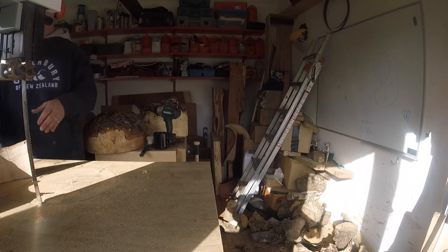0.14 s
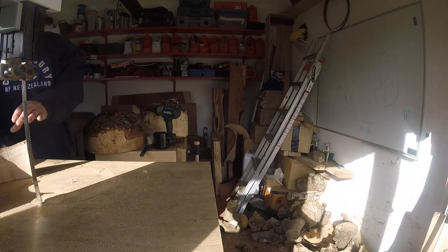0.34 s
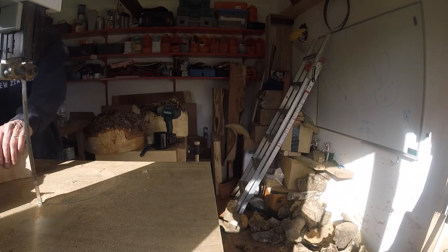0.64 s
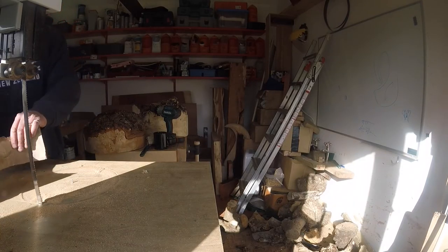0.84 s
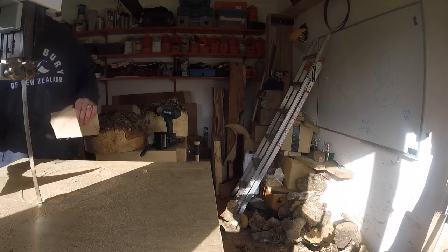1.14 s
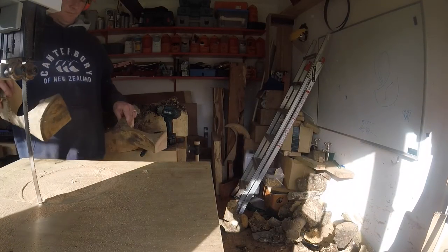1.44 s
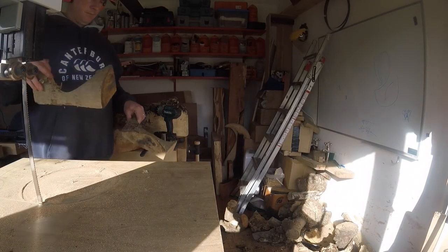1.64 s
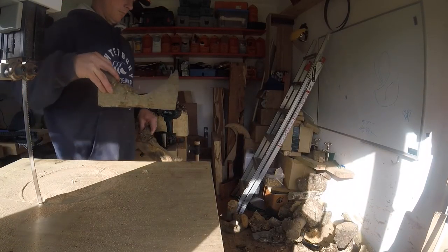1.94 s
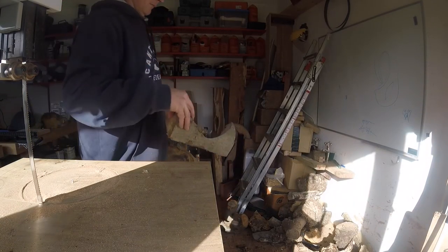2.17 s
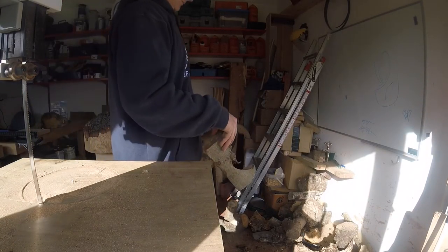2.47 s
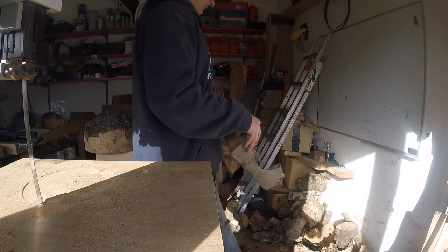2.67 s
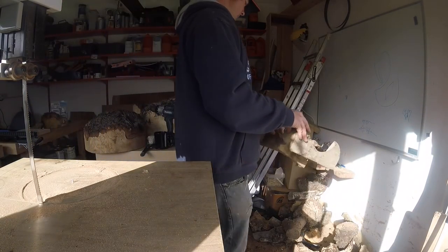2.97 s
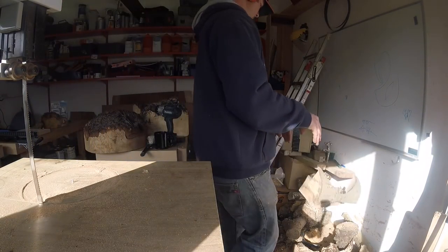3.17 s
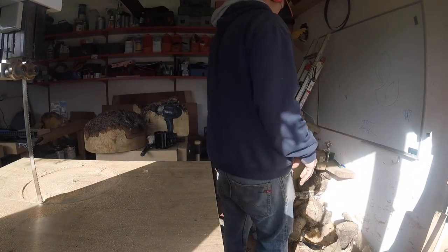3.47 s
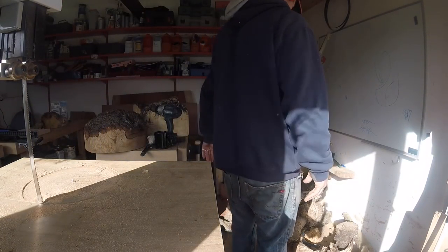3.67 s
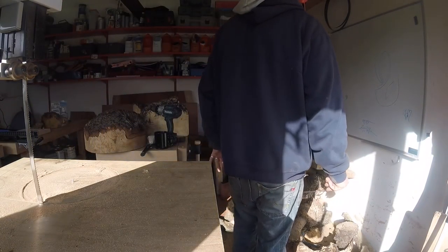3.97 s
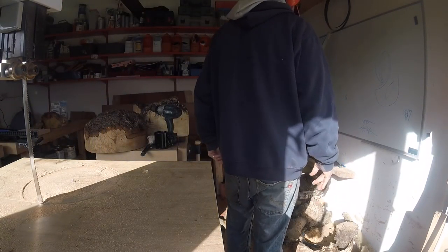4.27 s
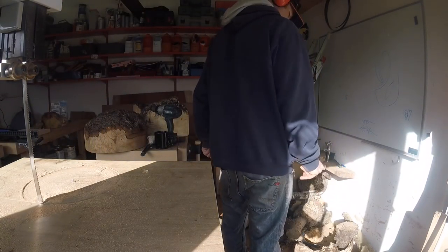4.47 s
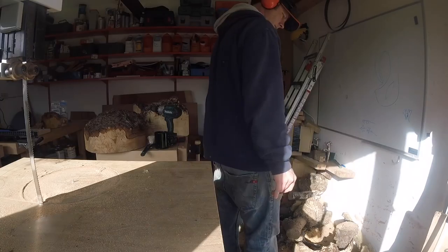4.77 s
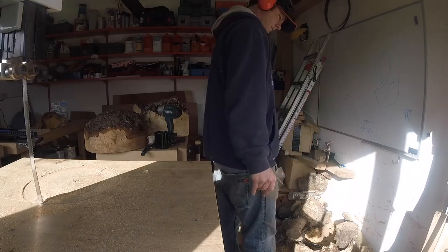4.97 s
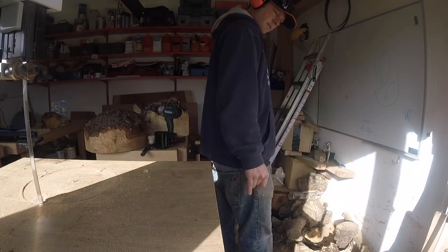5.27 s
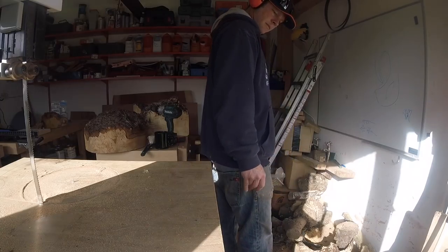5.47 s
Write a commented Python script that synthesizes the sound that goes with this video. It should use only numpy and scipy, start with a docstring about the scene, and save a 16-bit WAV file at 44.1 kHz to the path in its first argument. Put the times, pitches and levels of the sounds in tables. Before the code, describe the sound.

Over a steady, throbbing machine hum, a wooden block is handled with knocks and scuffs, then dropped on logs.

```python
"""In a small workshop, a bandsaw idles with a throbbing hum as its turning wheel shakes it.
A block of wood judders off the saw table, making it ring and rock. Hard pieces clack together,
and grit catches under shoes that scuff the floor. The wood is dropped on a log pile, where it
thuds, tumbles and settles: each knock rings the logs and echoes briefly in the room."""
import sys
import numpy as np
from scipy import signal
from scipy.fft import rfft, irfft
from scipy.io import wavfile
from scipy.ndimage import uniform_filter1d

SR = 44100
rng = np.random.default_rng(int(sys.argv[2]) if len(sys.argv) > 2 else 0)


def store_pcm(level_fs):
    """Save levels as 16-bit WAV."""
    pcm = np.round(np.clip(level_fs, -1, 1) * 32767).astype(np.int16)
    wavfile.write(sys.argv[1], SR, np.atleast_2d(pcm).T)


N = 247401


def amp(db):
    """Turns decibels into a gain."""
    return 10 ** (np.asarray(db) / 20)


def evened(x):
    """Scales a signal to an average (rms) level of 1."""
    return x / np.sqrt(np.mean(x ** 2) + 1e-20)


def curve(points, hz):
    """Joins (f/Hz, value) points with straight lines on an octave scale."""
    f, value = np.transpose(points)
    return np.interp(np.log(hz + 1), np.log(f + 1), value)


def add(mix, s, sound):
    """Mixes a sound in at s seconds."""
    part = mix[max(round(s * SR), 0):][:len(sound)]
    part += sound[:len(part)]


def coloured(x, points):
    """Filters x by a curve of (f/Hz, level/dB) points."""
    return irfft(rfft(x) * amp(curve(points, np.fft.rfftfreq(len(x), 1 / SR))), len(x))


def sharp_pulse(db):
    """The fastest-starting pulse with these levels, given from 0 Hz to half the sample rate."""
    log_gain = np.log(amp(np.maximum(np.r_[db, db[-2:0:-1]], -120)))
    return np.fft.ifft(np.exp(np.conj(signal.hilbert(log_gain)))).real


def drift(top_hz):
    """A slow random wander, about 1 in size."""
    t = np.arange(0, N, 100) / SR
    rates = top_hz * np.geomspace(1 / 10, 1, num=10)
    wander = sum(np.sin(2 * np.pi * (f * t + rng.random())) / np.sqrt(f) for f in rates)
    return evened(wander).repeat(100)[:N]


def shaken(modes):
    """Random shaking keeps an object's natural notes (its modes) ringing."""
    out, hz = np.zeros(N), np.fft.rfftfreq(N, 1 / SR)
    for f, width, db in modes:
        band = rfft(rng.standard_normal(N)) / (1 + ((hz - f) / width) ** 2)
        out += amp(db) * evened(irfft(band, N))
    return out


def struck(blows, modes, rattle_colour, detune, focus_db, rattle_db, rattle_t60, rise_s):
    """Blows ring an object while the touching faces rattle; a t60 is the time to fade by 60 dB."""
    out, t = np.zeros(N), np.arange(SR // 2) / SR
    hz, mode_db, t60 = np.transpose(modes)[:, :, None]
    attack = 1 - np.exp(-(t / rise_s) ** 2)
    for s, level_db, driven_hz in blows:
        # the length of the contact picks the notes that answer most
        gain = amp(mode_db - focus_db * np.log2(hz / driven_hz) ** 2)
        tuning, phase = rng.random((2, len(modes), 1))
        tuned_hz = hz * (1 + detune * (2 * tuning - 1))
        notes = gain * amp(-60 * t / t60) * np.sin(2 * np.pi * (tuned_hz * t + phase))
        ring = notes.sum(0) * np.sqrt(2) / np.linalg.norm(gain)
        rattle = evened(coloured(rng.standard_normal(len(t)), rattle_colour))
        rattle *= amp(rattle_db - 60 * t / rattle_t60)
        add(out, s, amp(level_db) * (ring + rattle) * attack)
    return out


def room(x, early_db=2, early_t60=0.18):
    """Sound bounces off nearby clutter, then leaves a tail whose treble dies first."""
    # how long the room rings: f/Hz, t60/s
    fade_times = [(150, 0.71), (500, 0.46), (1500, 0.52), (4000, .42), (8000, 0.42), (14000, 0.16)]
    echoes = np.zeros(SR)
    at = np.arange(70, SR - 20, 14)
    echoes[at + rng.integers(0, 14, len(at))] = rng.choice([-1., 1.], len(at))
    hz, t, bands = signal.stft(echoes, SR, nperseg=256)
    decay = amp(-60 * t / curve(fade_times, hz)[:, None]) + amp(early_db - 60 * t / early_t60)
    tail = signal.istft(bands * decay, SR, nperseg=256)[1]
    return signal.fftconvolve(x, tail / np.linalg.norm(tail))[:N]


def varied_room(x, count=4):
    """Fades between different room echoes, so that one knock does not ring just like the next."""
    turn = np.arange(N) / 700  # next echo every 16 ms
    shares = (np.maximum(1 - abs((turn - k) % count - 1), 0) for k in range(count))
    return sum(room(x * np.sqrt(share)) for share in shares)


def saw(wheel_hz=7.156, wander=0.0011, flutter_db=0.5, rush_db=-51.5, throb=0.015):
    """The wheel's tones beat against each other; the moving blade adds a rush and shakes the frame."""
    # tones of the hum: multiple of the wheel's turning rate, level/dB
    tones = [(19, -50), (20, -58), (23, -43.5), (24, -31.5), (25, -59), (28, -55), (29, -41), (30, -53),
             (40, -55), (57, -60), (90, -65)]
    # colour of the blade's rush: f/Hz, level/dB
    rush_colour = [(30, -51), (85, -20), (120, -19), (150, 10), (200, 3.5), (330, -4), (560, -9),
                   (1500, -14.5), (3300, -21), (5200, -33), (6700, -27), (9500, -29.5), (11800, -36.5),
                   (15000, -39.5)]
    # notes of the frame and guards: f/Hz, width/Hz, level/dB
    frame_modes = [(161.3, 9.4, -46), (303, 6.4, -57), (407.3, 7.6, -64.5), (685, 6.5, -64.5),
                   (1532, 40, -65), (1950, 180, -66.5)]
    turns = np.cumsum(wheel_hz * (1 + wander * drift(top_hz=2.03))) / SR
    hum = sum(amp(db) * np.sqrt(2) * np.sin(2 * np.pi * (k * turns + rng.random())) for k, db in tones)
    rush = coloured(rng.standard_normal(N), rush_colour)
    above_hum = signal.sosfilt(signal.butter(4, 400, "high", fs=SR, output="sos"), rush)
    rush *= amp(rush_db) / np.std(above_hum)  # rush_db sets the part above 400 Hz
    rush *= 1 + throb * np.sin(2 * np.pi * turns)
    hum *= amp(-flutter_db * drift(top_hz=13))
    return hum + rush + shaken(frame_modes)


def table_sway(peak_s=0.95, width_s=0.21, fall_db_per_s=10):
    """The table rocks as the block's weight leaves it, then calms to the motor's steady tremble."""
    # deep notes of the table on its stand: f/Hz, width/Hz, level/dB
    stand_modes = [(33, 8.7, -1.5), (70, 10, -3.5)]
    t = np.arange(N) / SR - peak_s
    swell = amp(-50) * np.exp(-(t / width_s) ** 2)
    tremble = (t > 0) * amp(-58 - fall_db_per_s * t)
    return (swell + tremble + amp(-81)) * shaken(stand_modes)


def scuffs(grain_db=5, attack_s=0.026):
    """Shoes, sleeves and bark rub: grit and fibres catch as each stroke presses and eases off."""
    # rubbing strokes: t/s, length/s, level/dB
    strokes = [(0.254, 0.14, -34), (0.553, 0.2, -48), (0.697, 0.036, -39), (0.822, 0.079, -40),
               (1.097, .14, -57), (1.582, 0.19, -37), (1.655, 0.65, -39), (1.928, 0.14, -36.5),
               (2.379, 0.086, -33.5), (2.438, 0.13, -33.5), (2.745, 0.18, -47.5), (2.93, .13, -46.5),
               (3.246, 0.19, -39), (3.311, 0.23, -31.5), (3.651, 0.18, -45.5), (4.158, .11, -49),
               (4.74, 0.4, -47.5), (5.103, 0.22, -46.5)]
    # colour of the rubbing: f/Hz, level/dB
    rub_colour = [(100, 1), (350, 5), (900, 2.5), (2300, 1), (4200, -4), (6500, -15.5), (10000, -24.5),
                  (15000, -41)]
    t = np.arange(N) / SR
    pressure = sum(amp(db) * np.interp(t - start, [0, attack_s, length], [0, 1, 0])
                   for start, length, db in strokes)
    grains = rng.standard_normal(N) * amp(grain_db * rng.standard_normal(N))
    return pressure * evened(coloured(grains, rub_colour))


def edge_ticks(t60=0.0032, focus_db=22, size=1024):
    """Sharp edges snap against each other in tiny bright bursts."""
    # snaps: t/s, level/dB, centre f/Hz
    snaps = [(1.275, -29, 3800), (1.435, -22.5, 4940), (1.9, -37, 9500), (2.136, -37, 3430),
             (2.652, -22, 7600), (3.337, -19.5, 10000), (3.363, -15, 5560), (3.407, -20, 9000),
             (4.707, -32, 1950)]
    out, hz, t = np.zeros(N), np.fft.rfftfreq(size, 1 / SR), np.arange(size) / SR
    for s, level_db, centre_hz in snaps:
        band_db = np.maximum(-focus_db * np.log2((hz + 1) / centre_hz) ** 2, -60)
        edge = sharp_pulse(band_db - 20 * (hz > 11500))
        burst = rng.choice([-1., 1.], size) * amp(level_db - 60 * t / t60)
        add(out, s, signal.fftconvolve(burst, edge / np.linalg.norm(edge)))
    return out


def clacks(gap_s=0.009, stretch=1.25, fall_db=1.5):
    """A hard, dry piece bounces on another, each time after a longer gap and more weakly."""
    # clacks: t/s, level/dB, most strongly driven f/Hz, number of touches
    hits = [(1.836, -18.5, 2400, 5), (1.9, -26.5, 2600, 2), (1.998, -25, 2550, 1), (2.239, -32.5, 2850, 1)]
    # notes of the piece: f/Hz, level/dB, t60/s
    piece_modes = [(2500, 7, 0.035), (2490, -5, 0.094), (2480, -10, 0.052), (2234, 3, 0.014),
                   (2080, -6, 0.022), (3080, -21, 0.039), (3350, -14, 0.043), (3530, -14, 0.049),
                   (3900, -8, 0.094), (5600, 4, .06)]
    bounces = [(s + gap_s * np.sum(stretch ** np.arange(k)), level_db - fall_db * k, hz)
               for s, level_db, hz, count in hits for k in range(round(count))]
    rattle_colour = [(500, -41), (2400, 13), (4000, 3), (9000, -39)]  # f/Hz, level/dB
    return struck(bounces, piece_modes, rattle_colour, detune=0.005, focus_db=17,
                  rattle_db=-2, rattle_t60=0.03, rise_s=0.00012)


def block_bumps():
    """The block judders along the saw table, and each bump rings the table."""
    # bumps: t/s, level/dB, most strongly driven f/Hz
    bumps = [(.596, -25.5, 404), (.627, -21.5, 370), (.68, -18, 398), (.714, -21, 820), (.727, -12.5, 364),
             (.802, -13.5, 150), (.816, -10.5, 157), (.832, -9, 420), (.852, -16.5, 696), (.872, -17, 230),
             (.9, -24, 220)]
    # notes of the table: f/Hz, level/dB, t60/s
    table_modes = [(142.5, 3, 0.28), (189, 13, 0.096), (246, -4, 0.3), (294.8, -4, 0.4), (316, 2, 0.15),
                   (386, 0.5, 0.069), (481, 0, 0.093), (506, -13, 0.094), (711, -10, 0.14),
                   (790, -22, 0.091), (978, -21, 0.14), (1190, -26, 0.18)]
    # f/Hz, level/dB
    rattle_colour = [(90, -48), (160, -9), (500, -1), (900, -19), (2000, -34), (8000, -38), (13000, -68)]
    return struck(bumps, table_modes, rattle_colour, detune=0.025, focus_db=6,
                  rattle_db=-16.5, rattle_t60=0.081, rise_s=0.0035)


def pile_thuds():
    """The weight of the wood lands on the pile and rings its low notes."""
    # landings: t/s, level/dB, most strongly driven f/Hz
    landings = [(3.362, -11.5, 200), (3.372, -16, 224), (3.388, -13, 380), (3.409, -16, 520),
                (3.429, -8.5, 306), (3.446, -19.5, 312)]
    # notes of the pile: f/Hz, level/dB, t60/s
    pile_modes = [(153.6, 3.5, 0.13), (176.3, 6, 0.28), (207, -16, 0.049), (250, -6, 0.076),
                  (309, 5.5, 0.1), (392, 5, 0.051), (450, 0, 0.067), (477, 1, 0.099), (657, 0, 0.11),
                  (820, -1, .1), (860, -13, 0.091), (1210, 20, 0.16)]
    # f/Hz, level/dB
    rattle_colour = [(90, -48), (180, 7), (700, 21), (1600, -3), (3000, -33), (8000, -47)]
    return struck(landings, pile_modes, rattle_colour, detune=0.035, focus_db=16.5,
                  rattle_db=-3.5, rattle_t60=0.064, rise_s=0.0014)


def chatter(t60, first_share=0.13, grain_db=6, size=6000):
    """One sharp touch, then a dying run of smaller ones as rough faces settle."""
    t = np.arange(size) / SR
    run = rng.standard_normal(size) * amp(grain_db * rng.standard_normal(size) - 60 * t / t60)
    run *= np.sqrt(1 - first_share) / np.linalg.norm(run)
    run[0] += np.sqrt(first_share)
    return run


def knocks(ring_db=6, note_db=5, note_width_hz=170, pivot_hz=1460, thinning_db_per_octave=11):
    """Knocks ring the logs; harder ones are brighter, and a piece gives little below its lowest note."""
    # a shoe landing first, then wood on wood:
    # t/s, level/dB, hardness/(dB per octave), lowest note f/Hz, chatter t60/s
    hits = [(.255, -38.5, -6.5, 650, .07), (1.274, -26.5, -1.4, 510, 0.052),
            (1.281, -28.5, -1.5, 650, 0.13), (1.434, -30, 0.7, 1160, 0.014),
            (1.671, -17.5, -2.5, 1450, 0.034), (1.692, -30, -4.5, 450, .04),
            (1.735, -22.5, -0.8, 1710, 0.26), (1.836, -18, -2.5, 2280, 0.033), (1.886, -23, 1, 2600, 0.14),
            (1.979, -24.5, 3.5, 380, .05), (1.998, -26, 1, 447, 0.068), (2.134, -35, -1.5, 1420, 0.043),
            (2.559, -44, 5.5, 2550, 0.038), (2.652, -28.5, 1, 1240, 0.056), (2.78, -44.5, 5.5, 1840, 0.061),
            (2.814, -44, 3, 2400, 0.05), (2.909, -42.5, 1.1, 900, 0.048), (3.335, -13, -0.8, 480, 0.077),
            (3.35, -15, 2, 1140, 0.036), (3.364, -19, -2, 684, .03), (3.376, -12.5, -3, 440, 0.066),
            (3.408, -16, 1, 380, .03), (3.421, -22, -4.5, 318, 0.023), (3.483, -23.5, 0.2, 475, 0.08),
            (3.577, -24.5, -11.5, 1790, 0.011), (3.592, -27.5, -9.5, 880, .04),
            (3.695, -30.5, -4, 1320, 0.12), (3.776, -43.5, 1, 2180, 0.04), (3.824, -26.5, -1.9, 460, 0.088),
            (3.844, -33, -7.5, 557, 0.03), (3.996, -40.5, -6.5, 1930, 0.033),
            (4.706, -28.5, -0.7, 1250, 0.15)]
    # notes of the split logs: f/Hz, width/Hz, level/dB
    log_modes = [(720, 17, -4), (811, 9.8, 4.5), (902, 10, 2), (1175, 30, -4), (1594, 16, -2),
                 (3250, 23, -24), (5600, 83, -34.5)]
    # colour that all knocks share: f/Hz, level/dB
    wood_colour = [(90, -39), (220, 45.5), (380, 36), (600, 34.5), (900, 36), (1300, 35.5), (2000, 34.5),
                   (3600, 31.5), (5800, 24.5), (7500, 15.5), (10000, 12), (12000, -2), (15000, -6),
                   (17000, -18)]
    out, hz = np.zeros(N), np.fft.rfftfreq(2048, 1 / SR)
    octaves = np.log2(np.clip(hz, 250, 9000) / pivot_hz)
    for s, hit_db, hardness, note_hz, t60 in hits:
        tuning = 1 + 0.012 * rng.uniform(-1, 1)  # no two logs are alike
        body = sum(amp(db) / (1 + ((hz - f * tuning) / width) ** 2) for f, width, db in log_modes)
        note = note_db / (1 + ((hz - note_hz) / note_width_hz) ** 2)
        peaks = np.maximum(ring_db * body, note)
        thinning = thinning_db_per_octave * np.minimum(np.log2((hz + 1) / note_hz), 0)
        wood = sharp_pulse(curve(wood_colour, hz) + hardness * octaves + thinning + peaks)
        add(out, s, amp(hit_db) * signal.fftconvolve(chatter(t60), wood))
    return out


def scene():
    """The saw and its table are close; the wood and the footwork sound through the room."""
    bumps = amp(1.5) * block_bumps()
    ringing = amp(-1) * pile_thuds() + clacks()
    light = amp(-4.5) * knocks() + amp(-4) * scuffs()
    near = bumps + edge_ticks()
    echoes = amp(1.5) * varied_room(light) + room(amp(-2) * ringing + amp(-14) * near)
    # a steep low cut, like a microphone's wind filter, takes the deep bass out of the handling sounds
    bass_cut = signal.butter(12, 125, "high", fs=SR, output="sos")
    handling = signal.sosfilt(bass_cut, light + ringing + near + echoes)
    return (handling + saw() + table_sway())[None]


def record(dry, top_hz=15200):
    """Cuts off the highest treble."""
    treble_cut = signal.firwin(511, top_hz, window=("kaiser", 9), fs=SR)
    return signal.oaconvolve(dry, treble_cut[None], "same")


dry = scene()
out = record(dry)
store_pcm(out)
```